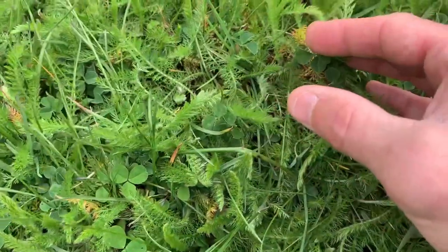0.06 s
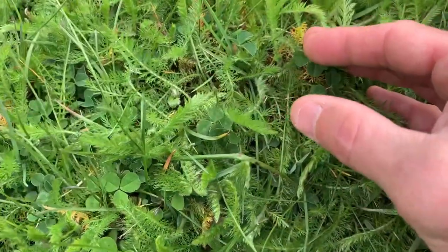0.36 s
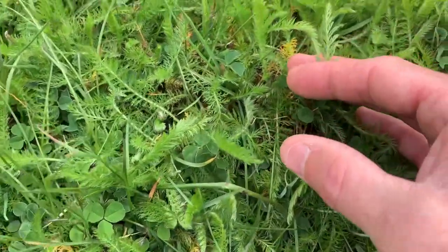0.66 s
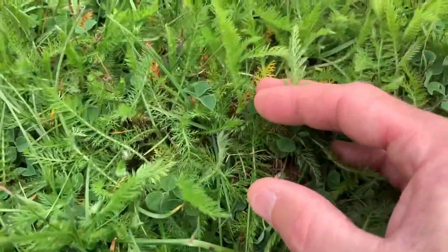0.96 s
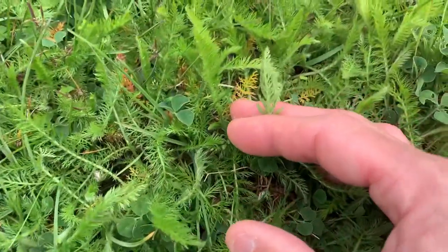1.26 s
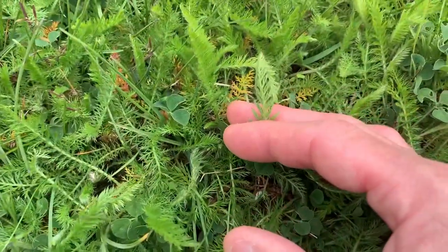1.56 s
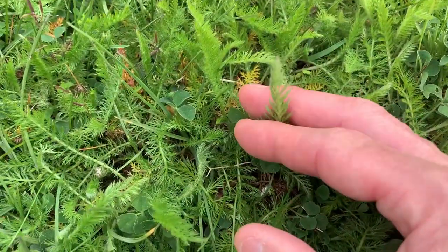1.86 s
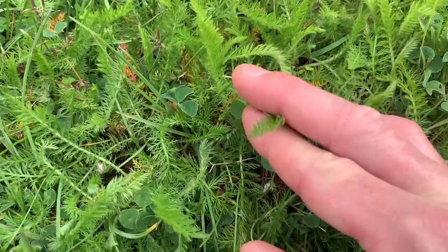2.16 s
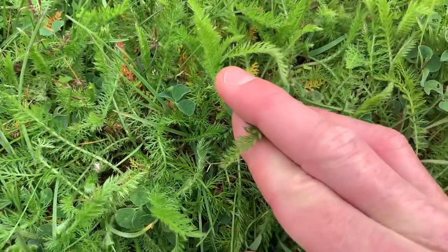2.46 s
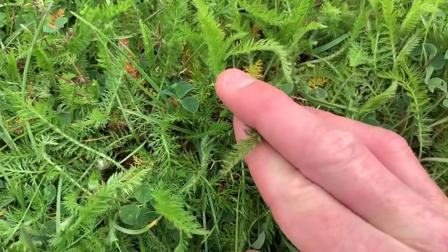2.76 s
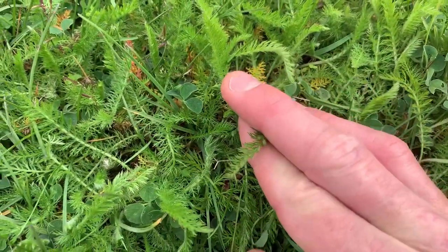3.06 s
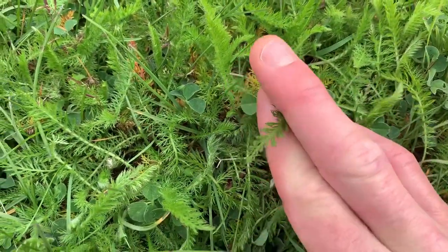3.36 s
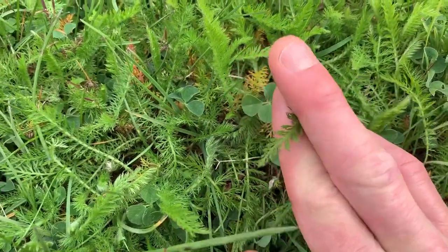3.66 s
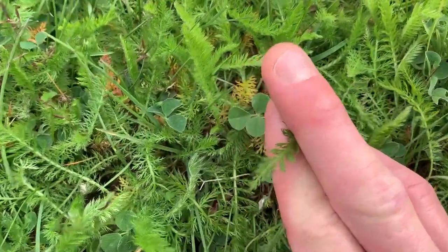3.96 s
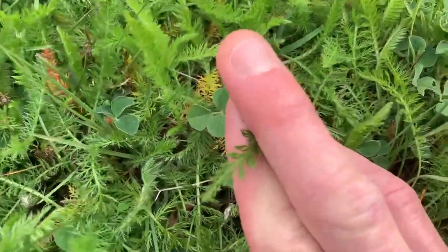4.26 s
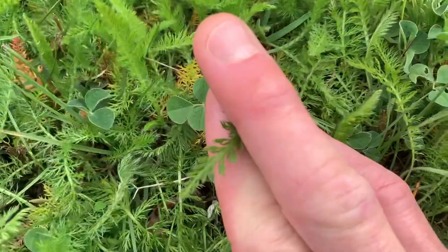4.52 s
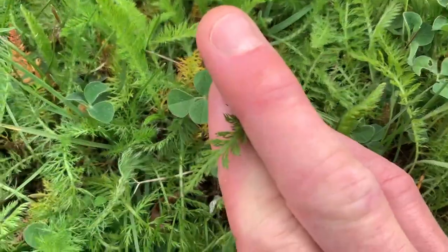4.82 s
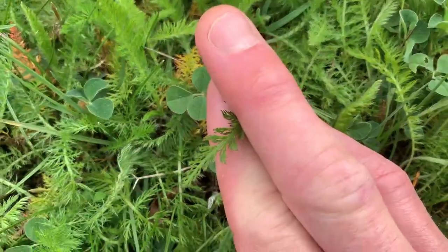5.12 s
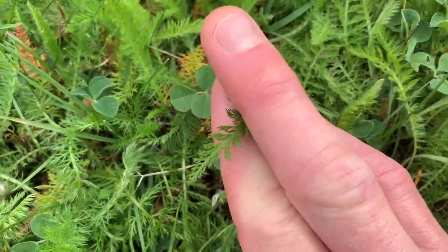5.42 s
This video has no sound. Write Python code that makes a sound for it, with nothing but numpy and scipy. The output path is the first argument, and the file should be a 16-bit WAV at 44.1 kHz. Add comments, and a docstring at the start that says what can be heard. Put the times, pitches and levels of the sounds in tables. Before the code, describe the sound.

A hand-held microphone rumbles and bumps softly while, right beside it, a hand feels through low plants, making light leaf rustles and tiny stem snaps that are busiest a little after halfway. In the surrounding woods, one bird opens with two downward slides, another repeats an even whistle midway, and several chirp and twitter together near the end. Faint outdoor air lies underneath.

```python
"""Songbirds and a hand in the leaves

Birds repeat near-pure whistled syllables, each from its own direction; the wood scatters them back.
Close by, fingers feel through low plants: leaves rustle and rasp, stalks snap, stems flick.
The grip on a hand-held camera rumbles and bumps softly. Faint air hiss and far wind lie beneath."""
import sys
import numpy as np
from scipy import signal
from scipy.fft import rfft, irfft
from scipy.io import wavfile
from scipy.ndimage import uniform_filter1d

SR = 44100
rng = np.random.default_rng(int(sys.argv[2]) if len(sys.argv) > 2 else 0)


def persist_wave(psi):
    """Save psi, clipped to +-1, as 16-bit WAV."""
    counts = np.round(np.clip(psi, -1, 1) * 32767).astype(np.int16)
    wavfile.write(sys.argv[1], SR, np.atleast_2d(counts).T)


N = 250752
TIME_S, BINS_HZ = np.arange(N) / SR, np.fft.rfftfreq(N, 1 / SR)
NEAR_LEAD_MS = -.293  # right port ahead of left

# syllable shapes: (time [s], pitch [ratio], level [dB])
SLIDE = [(0, 1.9, -26), (.003, 1.6, -9), (.007, 1.5, -10), (.011, 1.35, -20), (.018, 1.3, -14),
         (.036, 1.15, -9), (.052, 1.08, -3), (.064, 1.02, 0), (.08, .92, 0), (.09, .87, -3), (.1, .82, -6),
         (.126, .73, -11), (.145, .66, -15), (.157, .61, -20)]
WHISTLE = [(0, .82, -17), (.01, .92, -8), (.026, .98, -4), (.06, .998, -1), (.1, 1.002, 0),
           (.172, .996, -1.5), (.186, .994, -18)]
CHIP = [(0, .72, -28), (.006, .91, -13), (.011, .985, -5), (.02, 1, -3), (.032, .99, -1), (.041, .94, 1),
        (.05, .85, -.5), (.058, .81, -6), (.064, .81, -22)]
ARCH = [(0, .84, -13), (.018, .89, -5), (.04, .97, -2), (.056, 1.01, -1.5), (.07, .97, 0), (.085, .87, -2),
        (.1, .79, -6), (.115, .73, -15)]
LISP = [(0, 1.33, -13), (.006, 1.2, -5), (.016, 1.1, -1), (.028, 1.03, 1), (.04, .99, 0), (.052, .99, -3),
        (.064, 1.02, -14)]
BUZZ = [(0, 1.02, -14), (.015, 1.02, -1), (.05, 1, 0), (.085, .98, -2), (.1, .97, -14)]
SWOOP = [(0, .6, -10), (.03, .72, -5), (.055, .92, -1), (.085, 1, 0), (.105, .96, 0), (.125, .82, 2.5),
         (.145, .65, 3), (.158, .55, -10)]
SLUR = [(0, 1, -12), (.03, .97, -4), (.05, .89, 0), (.065, .77, 2), (.08, .63, 2), (.09, .55, -8)]
PIPE = [(0, 1, -17.5), (.015, 0.98, 4.5), (.07, 1, -3), (.1, 0.93, 9.5)]
DROP = [(0, 1.2, -12), (.014, 1.06, -2), (.026, .98, 0), (.04, .9, -4), (.048, .88, -14)]
TSIP = [(0, 1.3, -13), (.003, 1.4, 6), (.006, .95, 14), (.009, 0.44, 4)]
# syllables sung: (start [s], length [ratio], pitch [Hz], level [dB])
SLIDE_NOTES = [(.013, 1, 2280, -42.3), (.321, 1, 2230, -44.8)]
WHISTLE_NOTES = [(-.16, 1, 2750, -68), (.108, .93, 2770, -61.5), (2.503, .97, 2805, -62.5),
                 (2.839, 1, 2758, -54.5), (3.177, .97, 2736, -56.5), (3.507, 1, 2726, -55.5)]
CHIP_NOTES = [(.902, .85, 3690, -69), (4.342, .8, 3800, -70), (4.713, 1, 3790, -52.5),
              (5.015, 1, 3580, -47.5), (5.332, 1, 3550, -46), (5.657, 1, 3470, -48)]
ARCH_NOTES = [(.98, .91, 2677, -61.5), (4.421, .86, 2693, -62.5), (4.797, 1, 2520, -57),
              (5.101, 1.07, 2147, -57.5), (5.423, 1.13, 2070, -62.5)]
LISP_NOTES = [(4.31, 1, 5560, -70.5), (4.48, 1, 5470, -68), (4.652, 1, 5500, -65.5), (4.828, 1, 5500, -69)]
BUZZ_NOTES = [(.885, .9, 3550, -80), (1.418, 1.1, 6030, -77), (2.42, .6, 4800, -78), (4.33, .6, 6200, -77),
              (4.53, .9, 5900, -76), (4.68, 1.5, 6000, -71), (4.83, 1, 5900, -73), (4.98, 1.1, 6150, -72),
              (5.145, 1.2, 5950, -73), (5.285, .7, 5300, -79), (5.37, 1, 6200, -76), (5.5, .9, 5100, -79)]
SWOOP_NOTES = [(3.42, 1, 3200, -66)]
SLUR_NOTES = [(3.013, 1, 3250, -70)]
PIPE_NOTES = [(.648, 1.85, 5290, -80.5), (1.24, 1.9, 2420, -90), (1.53, 1, 6980, -91),
              (2.42, .8, 3300, -90), (3.12, 1, 1770, -81), (3.172, .35, 1860, -77),
              (3.655, .7, 1857, -79.5)]
DROP_NOTES = [(1.668, .9, 4800, -76), (1.868, 1, 4900, -73.5), (2.07, .8, 4750, -76),
              (2.268, .9, 4800, -74.5), (4.405, .9, 4550, -78), (4.57, 1.1, 4550, -73),
              (4.745, .9, 4550, -72), (4.92, 1.1, 4550, -74), (5.06, .8, 4900, -82), (5.382, .8, 5200, -80),
              (5.588, .9, 5050, -72.5)]
TSIP_NOTES = [(1.809, .82, 4220, -78), (2.114, .81, 4510, -75), (2.161, 0.89, 4480, -75)]

# fingers through leaves: (start [s], length [s], fizz level [dB], fizz over body [dB])
STROKES = [(0.363, 0.097, -70.5, 21), (0.61, 0.16, -71.5, 13), (0.77, 0.19, -74, 5.5),
           (1.006, 0.14, -66.5, 11.5), (1.774, 0.21, -72, 12), (2.03, 0.27, -71, 11.5),
           (3.038, 0.13, -63.5, 6), (3.233, 0.079, -72, 4), (3.268, 0.15, -60, 8.5), (3.429, 0.12, -66, 11),
           (3.86, 0.26, -67, 9), (4.12, 0.15, -65, 10.5)]
# fronds over skin, palm over case: (start [s], length [s], level [dB])
RASPS = [(1.82, 0.57, -81.5), (3.92, 0.22, -78.5), (4.08, 0.37, -80)]
PALM_SLIDES = [(1.56, 0.096, -67), (1.82, 0.07, -60.5), (2.11, 0.094, -73), (2.25, 0.47, -66),
               (2.75, 0.43, -62.5), (3.46, 0.067, -60.5), (3.92, 0.045, -72), (4.13, 0.51, -62.5),
               (5.0, .25, -69), (5.42, 0.34, -61)]
# stalks breaking: (time [s], level [dB])
SNAPS = [(.436, -51), (.649, -48), (.675, -52), (.706, -51), (.749, -49), (1.858, -49), (2.006, -52),
         (2.253, -48), (2.391, -55), (2.951, -47), (3.197, -49), (3.3235, -45), (3.361, -42), (3.489, -25),
         (3.5167, -35), (3.828, -53), (3.84, -40.5), (4.048, -41), (4.168, -47), (4.201, -43),
         (4.229, -41.5), (4.426, -50), (4.468, -48), (4.496, -50), (5.622, -53)]
# stems flicking off a finger: (time [s], peak [dB], pitch [Hz])
FLICKS = [(1.123, -55.5, 4570), (2.197, -52.5, 5360), (2.36, -57.5, 6400), (3.08, -55, 5400),
          (3.15, -47.5, 5360), (3.178, -51, 5700), (3.262, -53.5, 4540), (3.563, -65, 4600),
          (4.122, -65, 4700)]
# grip rumble, and its side signal relative to mid: (time [s], level [dB])
GRIP_LEVEL = [(0.0, -47), (.07, -45.5), (.19, -50.5), (.3, -46.5), (.42, -46.5), (.62, -43), (.78, -45.5),
              (.94, -46.5), (1.19, -49), (1.38, -39), (1.5, -50), (1.81, -43.5), (2.0, -49.5), (2.2, -42),
              (2.5, -49), (2.92, -47.5), (3.1, -50), (3.25, -43.5), (3.5, -46), (3.9, -49.5), (4.3, -47.5),
              (4.53, -44.5), (4.72, -41), (4.88, -47.5), (5.03, -49), (5.25, -51), (5.42, -53),
              (5.68, -49.5)]
GRIP_WIDTH = [(0, -89.5), (2.5, -21), (5.6, -2.5)]
# grip bumps: (time [s], level [dB], pitch [Hz], ring [s], relative knock level [dB])
BUMPS = [(.292, -37, 103, 0.0088, -19), (0.554, -29.5, 73, 0.0084, -29), (0.845, -30.5, 75, 0.018, -17.5),
         (0.861, -23, 127.6, 0.007, -9), (1.342, -33, 135, 0.0081, -22.5), (1.454, -30.5, 103, 0.013, -43),
         (1.531, -31, 117, 0.014, -18), (1.553, -22, 126.5, 0.011, -19), (1.58, -27.5, 73.5, 0.026, -23.5),
         (1.635, -31, 100.8, 0.023, -26), (2.189, -31.5, 78, 0.0038, -46), (2.296, -30.5, 70, 0.02, -23.5),
         (3.351, -30, 79.4, 0.0077, -45), (3.618, -31.5, 81.4, 0.012, -54), (3.708, -34, 156, 0.0065, -54),
         (3.785, -32, 64, 0.015, -59), (4.53, -38, 60.6, 0.0085, -40), (4.594, -35, 69, 0.0062, -51),
         (4.699, -35.5, 50.7, 0.013, -43), (5.021, -27.5, 79, 0.0088, -53),
         (5.372, -43.5, 141, 0.0063, -9.5)]
# case resonances: (frequency [Hz], gain [dB], ring [s])
CASE_MODES = [(243, 5, 0.0028), (476, -15, 0.0033)]

# spectra: (frequency [Hz], gain [dB])
WOOD_COLOUR = [(1500, 4), (2700, 10), (4000, 12.5), (6500, -8)]
LEAF_COLOUR = [(300, 2.5), (700, 10), (1200, 8.5), (1800, 9), (3000, 6), (4500, 5), (7000, 0),
               (10000, -0.5), (13700, -8.5), (15000, -9.5), (16000, -14)]
RASP_COLOUR = [(1500, -18), (3300, -8), (4000, 5), (4800, 5.5), (5800, -19), (9000, -38)]
SNAP_COLOUR = [(500, -32), (2500, -18), (6000, -7.5), (10000, -6), (12000, -4), (14200, -3), (15000, -8),
               (16000, -15)]
GRIP_COLOUR = [(15, -13), (25, -11), (45, 4), (70, 5.5), (115, 1), (170, -6.5), (245, -17.5), (350, -29.5),
               (450, -37), (640, -67.5), (900, -71.5), (2000, -100)]
SCUFF_COLOUR = [(20, -16), (50, 15.5), (130, 22.5), (260, 7.5), (400, -16.5), (550, -33), (800, -43),
                (2000, -71)]
PALM_COLOUR = [(80, -8), (180, 3.5), (290, -0.5), (400, -9.5), (550, -20.5), (900, -43), (2000, -47)]
AIR_COLOUR = [(200, -10.5), (400, 17), (800, 4.5), (1400, 0.5), (3000, -2), (5000, -2), (7000, -4),
              (10000, -4.5), (14200, -4), (15000, -9.5), (16000, -13)]
WIND_COLOUR = [(60, -12.5), (180, 1), (330, 2.5), (520, -14), (900, -31.5), (2000, -53.5)]
# left-right likeness: (frequency [Hz], correlation [0..1])
LEAF_LIKENESS = [(300, 0.23), (1500, 0.021), (4000, 0.15), (6500, 0.24), (9000, 0.55), (15000, 1)]
AIR_LIKENESS = [(400, 0.11), (1000, 0.067), (4000, 0.071), (6500, 0.11), (9000, 0.98), (15000, 1)]
SCUFF_LIKENESS = [(100, 1), (300, 1), (600, .4)]
PALM_LIKENESS = [(200, .83), (600, .55)]
WIND_LIKENESS = [(150, 1), (600, .23)]


def songs():
    """Near birds come mostly direct, far ones blurred and with more echo, the farthest by echo alone."""
    slides = bird(SLIDE, SLIDE_NOTES, lead_ms=-.285, waver=.008, flutter_db=1.3, waver_hz=160)
    whistles = bird(WHISTLE, WHISTLE_NOTES, lead_ms=.055, waver=.0008, flutter_db=.6)
    chips = bird(CHIP, CHIP_NOTES, lead_ms=.378, waver=.004, flutter_db=.8)
    arches = bird(ARCH, ARCH_NOTES, lead_ms=.375, waver=.009, flutter_db=1.5)
    lisps = bird(LISP, LISP_NOTES, lead_ms=-.295, waver=.018, flutter_db=3, waver_hz=220)
    buzzes = bird(BUZZ, BUZZ_NOTES, lead_ms=.33, waver=.03, flutter_db=3.5, waver_hz=260)
    far = bird(SWOOP, SWOOP_NOTES, lead_ms=.06, waver=.01, flutter_db=2.5)
    far += bird(SLUR, SLUR_NOTES, lead_ms=.06, waver=.01, flutter_db=2)
    far += bird(PIPE, PIPE_NOTES, lead_ms=.05, waver=.005, flutter_db=2.5)
    far += bird(DROP, DROP_NOTES, lead_ms=-.36, waver=.015, flutter_db=2.5)
    far += bird(TSIP, TSIP_NOTES, lead_ms=.43, waver=.01, flutter_db=1)
    near = leftward(whistles, db=1) + leftward(chips, db=.6)
    near += through_leaves(slides + leftward(arches, db=3), share=.12)
    distant = through_leaves(lisps + gain_of(-7) * buzzes + far, share=.5)
    echo_send = gain_of(-5) * slides + gain_of(-2) * whistles + gain_of(-9.5) * chips
    echo_send += gain_of(.5) * arches + gain_of(6) * (lisps + buzzes) + gain_of(1) * far
    return near + distant + wood_echo(echo_send + twitter())


def bird(shape, notes, lead_ms, waver, flutter_db, waver_hz=100):
    """A sine follows the syllable shape, wavering in pitch and level; the left port leads by lead_ms."""
    out, wobble, flutter = np.zeros((2, N)), drift(waver_hz), drift(53)
    shape_s, ratio, shape_db = np.transpose(shape)
    for start_s, stretch, hz, db in notes:
        t = np.arange(0, shape_s[-1] * stretch, 1 / SR)
        pitch_hz = hz * uniform_filter1d(np.interp(t / stretch, shape_s, ratio), 200, mode="nearest")
        cycles = np.cumsum(pitch_hz * (1 + waver * np.interp(start_s + t, TIME_S, wobble))) / SR
        level_db = db + np.interp(t / stretch, shape_s, shape_db)
        level_db += flutter_db * np.interp(start_s + t, TIME_S, flutter)
        ports = np.sin(2 * np.pi * np.array([cycles, cycles - pitch_hz * lead_ms / 1000]))
        add(out, start_s, ports * gain_of(level_db) * signal.windows.tukey(len(t), .06))
    return out


def twitter(count=26, span_s=(4.35, 5.3), range_hz=(4300, 6700), level_db=-76):
    """The farthest birds lisp at random times and pitches."""
    notes = [(rng.uniform(*span_s), 1, rng.uniform(*range_hz), level_db) for _ in range(count)]
    return bird(LISP, notes, lead_ms=0, waver=.025, flutter_db=3.5)


def through_leaves(x, share, blur_s=.009):
    """A share of the song's power takes short detours through leaves and smears."""
    taps = scatter(np.exp(-np.arange(SR // 10) / SR / blur_s))
    return np.sqrt(1 - share) * x + np.sqrt(share) * signal.fftconvolve(x, taps, axes=1)[:, :N]


def wood_echo(x, trunk_t60_s=.9, foliage_t60_s=.2, foliage_db=3.5, rise_s=.007, gain_db=-13):
    """Near foliage scatters the song back quickly; trunks add a longer tail."""
    t = np.arange(SR) / SR
    decay = gain_of(-60 * t / trunk_t60_s) + gain_of(foliage_db - 60 * t / foliage_t60_s)
    taps = scatter(decay * (1 - np.exp(-t / rise_s)))
    taps = irfft(rfft(taps) * gain_of(curve_at(WOOD_COLOUR, np.fft.rfftfreq(SR, 1 / SR))), SR)
    return gain_of(gain_db) * signal.fftconvolve(x, taps, axes=1)[:, :N]


def scatter(envelope, echoes_per_s=8000):
    """Small random echoes under an envelope, total energy 1 per port."""
    size = (2, len(envelope))
    taps = envelope * rng.choice([-1, 1], size) * (rng.random(size) < echoes_per_s / SR)
    return taps / np.linalg.norm(taps, axis=1, keepdims=True)


def rustle(grains_per_s=300, spread_db=4, clump_db=3.5, clump_hz=30, split_hz=5000):
    """Leaflets slip past the fingers and let go in bunches: fine hiss with clumps of crackle."""
    drive = 1.58 * rng.standard_normal((2, N)) + gain_of(-1.5) * clicks(per_s=120)
    for hz in np.geomspace(1200, 14000, 8):  # each leaflet has its own band
        sizes = gain_of(spread_db * np.minimum(rng.exponential(1, (2, N)), 5))
        grains = sizes * rng.choice([-1, 1], (2, N)) * (rng.random((2, N)) < grains_per_s / SR)
        clumps = unit_rms(grains * gain_of(clump_db * drift(clump_hz)))
        band = np.exp(-np.log(BINS_HZ / hz + 1e-9) ** 2 / .063)
        drive += .77 * irfft(rfft(clumps) * band, N)
    leaves = port_pair(drive, LEAF_COLOUR, LEAF_LIKENESS, NEAR_LEAD_MS)
    body = signal.sosfiltfilt(signal.butter(2, split_hz, fs=SR, output="sos"), leaves)
    fizz_gain, body_gain = touch_gains()
    return ((leaves - body) * fizz_gain + body * body_gain) * gain_of(2.53 * drift(40))


def touch_gains(rest_db=-80.5, rest_bright_db=2.5):
    """Fizz and body gains: a light touch has little body; the resting hand still stirs the leaves."""
    fizz_power, body_power = gain_of(rest_db) ** 2, gain_of(rest_db - rest_bright_db) ** 2
    for start_s, length_s, db, bright_db in STROKES:
        envelope = stroke(start_s, length_s)
        fizz_power += (gain_of(db) * envelope) ** 2
        body_power += (gain_of(db - bright_db) * envelope) ** 2
    return np.sqrt(fizz_power), np.sqrt(body_power)


def stroke(start_s, length_s, rise_s=.093, fade_s=.06):
    """A hand stroke eases in, holds and fades."""
    rise = np.sin(np.pi / 2 * np.clip((TIME_S - start_s) / rise_s + 1 / 4, 0, 1)) ** 2
    return rise * np.exp(-np.maximum(TIME_S - start_s - length_s, 0) / fade_s)


def dragging(strokes, colour, likeness, slips_per_s):
    """Skin drags over a surface in many tiny slips, heard in one band."""
    envelope = sum(gain_of(db) * stroke(start_s, length_s) for start_s, length_s, db in strokes)
    return envelope * port_pair(clicks(slips_per_s), colour, likeness, NEAR_LEAD_MS)


def snaps(decay_s=.00074, splinter_db=-13, splinter_s=.008, splinters_per_s=2500):
    """A stalk gives way in one short burst; its last fibres splinter after it."""
    out, t = np.zeros(N), np.arange(SR // 20) / SR
    for start_s, db in SNAPS:
        tears = rng.random(len(t)) < splinters_per_s / SR
        splinters = gain_of(splinter_db) * tears * np.exp(-t / splinter_s)
        burst = rng.standard_normal(len(t)) * (np.exp(-t / decay_s) + splinters)
        add(out, start_s, gain_of(db) * burst / abs(burst).max())
    left = rfft(out) * gain_of(curve_at(SNAP_COLOUR) + 1)
    return irfft(np.array([left, delayed(left, NEAR_LEAD_MS)]), N)


def flicks(ring_s=.0013, width_ratio=.2):
    """A stiff stem springs free and rings for an instant."""
    out, t, hz = np.zeros((2, N)), np.arange(512) / SR, np.fft.rfftfreq(512, 1 / SR)
    for start_s, db, pitch_hz in FLICKS:
        band = np.exp(-((hz / pitch_hz - 1) / width_ratio) ** 2) + .072
        burst = irfft(rfft(rng.standard_normal((2, len(t)))) * band) * np.exp(-t / ring_s)
        add(out, start_s, gain_of(db) * burst / abs(burst).max())
    return out


def grip(creep_s=.048, creep_db=-20.5, trim_db=.5):
    """Skin creeps on the camera case: a lumpy rumble that swells around each bump and slowly widens."""
    power = gain_of(np.interp(TIME_S, *np.transpose(GRIP_LEVEL)) + trim_db) ** 2
    for bump_s, db, *_ in BUMPS:
        power += gain_of(db + creep_db) ** 2 * np.exp(-abs(TIME_S - bump_s) / creep_s)
    mid, side = unit_rms(irfft(rfft(rng.standard_normal((2, N))) * gain_of(curve_at(GRIP_COLOUR)), N))
    side *= gain_of(np.interp(TIME_S, *np.transpose(GRIP_WIDTH)))
    return np.sqrt(power) * gain_of(2.1 * drift(13)) * np.array([mid + side, mid - side])


def bumps(scuff_db=-13, knock_lead_s=.00505):
    """Each bump knocks the case, then rocks it for a cycle or two, with a scuff of skin."""
    motion, pressure, t = np.zeros(N), np.zeros(N), np.arange(-SR // 20, SR // 5) / SR
    knock = sum(gain_of(db) * swell(t, ring_s) * np.sin(2 * np.pi * hz * t)
                for hz, db, ring_s in CASE_MODES)
    for bump_s, db, hz, ring_s, knock_db in BUMPS:
        start_s = bump_s + t[0]
        push = gain_of(db) * swell(t, ring_s)
        add(motion, start_s, -push * np.sin(2 * np.pi * hz * t))
        add(motion, start_s - knock_lead_s, gain_of(db + knock_db) * knock)
        add(pressure, start_s, push)
    scuff = port_pair(rng.standard_normal((2, N)), SCUFF_COLOUR, SCUFF_LIKENESS)
    return motion + gain_of(scuff_db) * pressure * scuff


def swell(t, ring_s, rise_ratio=.38):
    """A soft push of height 1 that builds faster than it dies."""
    push = 1 / (np.exp(-t / (rise_ratio * ring_s)) + np.exp(t / ring_s))
    return push / push.max()


def air(hiss_db=-77, wind_db=-76, gust_db=4.4, gust_hz=3.8):
    """Even hiss of open air over a low rush of wind in far trees."""
    hiss = port_pair(rng.standard_normal((2, N)), AIR_COLOUR, AIR_LIKENESS, NEAR_LEAD_MS)
    wind = port_pair(rng.standard_normal((2, N)), WIND_COLOUR, WIND_LIKENESS)
    return gain_of(hiss_db) * hiss + gain_of(wind_db + gust_db * drift(gust_hz)) * wind


def port_pair(drive, colour, likeness, lead_ms=0):
    """Two unrelated signals, coloured and blended as two microphone ports hear them; rms 1."""
    left, other = rfft(drive)
    correlation = curve_at(likeness)
    right = delayed(correlation * left + np.sqrt(1 - correlation ** 2) * other, lead_ms)
    return unit_rms(irfft(np.array([left, right]) * gain_of(curve_at(colour)), N))


def delayed(spectrum, ms):
    """Delay as a phase slope."""
    return spectrum * np.exp(-2j * np.pi * BINS_HZ * ms / 1000)


def leftward(x, db):
    """Left port louder than right by db."""
    return x * gain_of([[db / 2], [-db / 2]])


def clicks(per_s):
    """Two unrelated random click trains, rms 1."""
    return unit_rms(rng.uniform(-.96, 1, (2, N)) * (rng.random((2, N)) < per_s / SR))


def drift(rate_hz):
    """Random motion below rate_hz, rms 1."""
    return unit_rms(irfft(rfft(rng.standard_normal(N)) / (1 + (BINS_HZ / rate_hz) ** 4), N))


def curve_at(points, hz=BINS_HZ):
    """Interpolates on a log-frequency axis."""
    points_hz, values = np.transpose(points)
    return np.interp(np.log(hz + 1), np.log(points_hz + 1), values)


def add(mix, start_s, sound):
    """Adds a sound into the mix, cut at the edges."""
    start = round(start_s * SR)
    sound = sound[..., max(-start, 0):]
    part = mix[..., max(start, 0):][..., :sound.shape[-1]]
    part += sound[..., :part.shape[-1]]


def gain_of(db):
    """Decibels to amplitude."""
    return 10 ** (np.asarray(db) / 20)


def unit_rms(x):
    """Scales to rms 1."""
    return x / np.sqrt(np.mean(x ** 2) + 1e-20)


def scene():
    """Birds, hand in the leaves, grip on the camera, air."""
    palm = dragging(PALM_SLIDES, PALM_COLOUR, PALM_LIKENESS, slips_per_s=690)
    fronds = dragging(RASPS, RASP_COLOUR, LEAF_LIKENESS, slips_per_s=700)
    return songs() + grip() + palm + bumps() + rustle() + fronds + snaps() + flicks() + air()


def record(dry):
    """Steep low-pass at 15.9 kHz."""
    taps = signal.firwin(511, 15900, window=("kaiser", 9), fs=SR)
    return signal.oaconvolve(dry, taps[None], "same", axes=1)


dry = scene()
out = record(dry)
persist_wave(out)
```